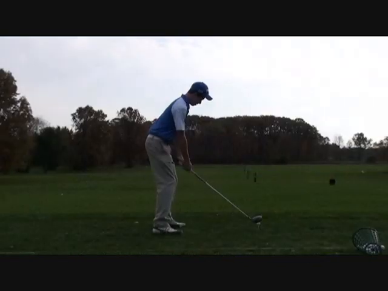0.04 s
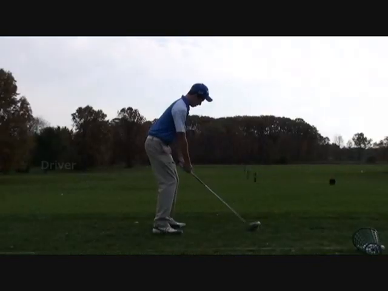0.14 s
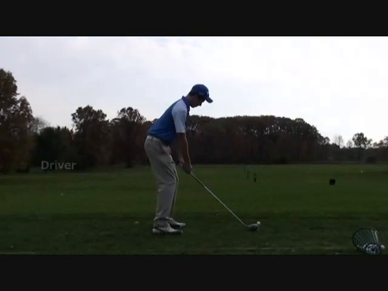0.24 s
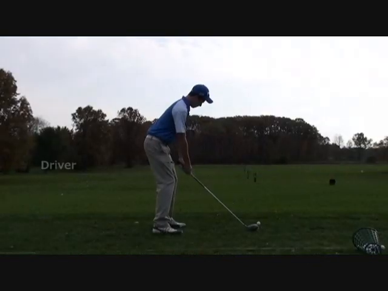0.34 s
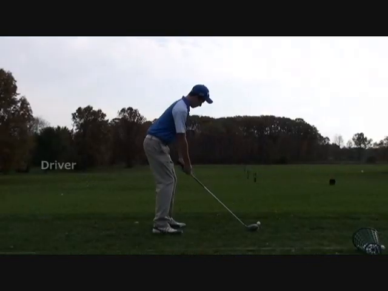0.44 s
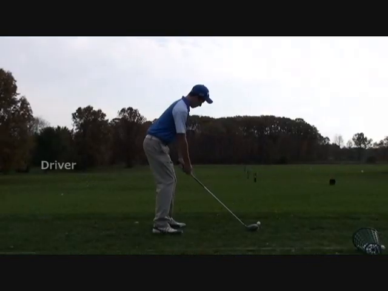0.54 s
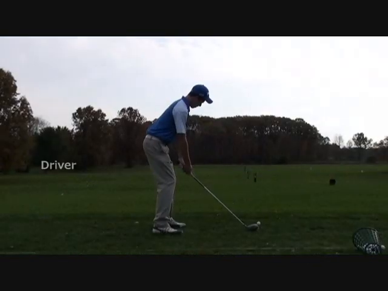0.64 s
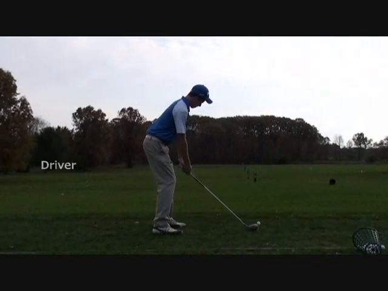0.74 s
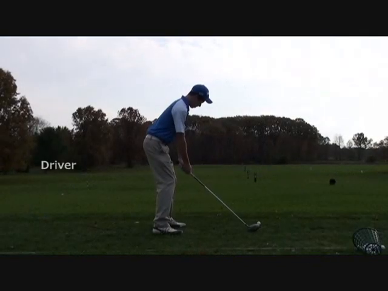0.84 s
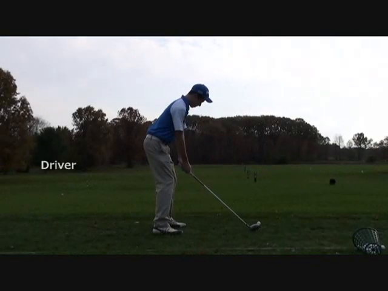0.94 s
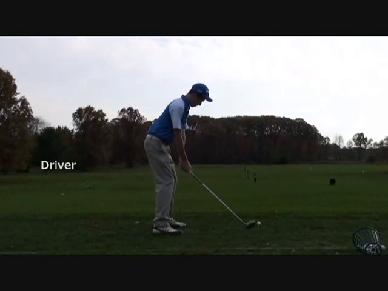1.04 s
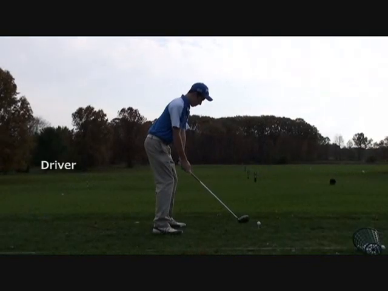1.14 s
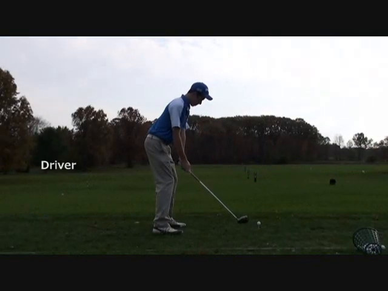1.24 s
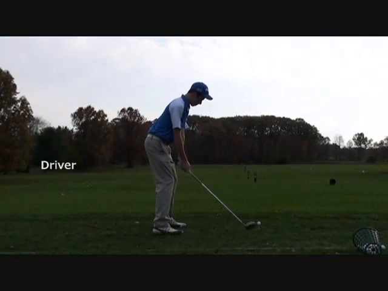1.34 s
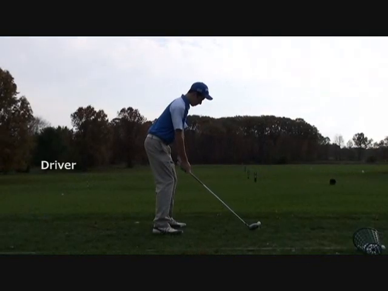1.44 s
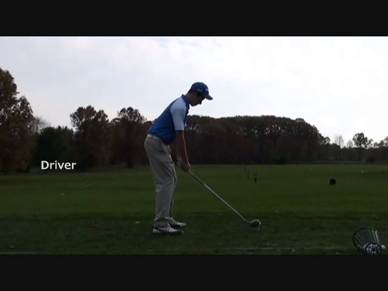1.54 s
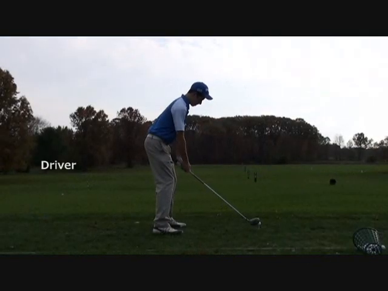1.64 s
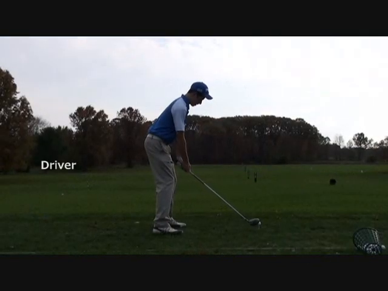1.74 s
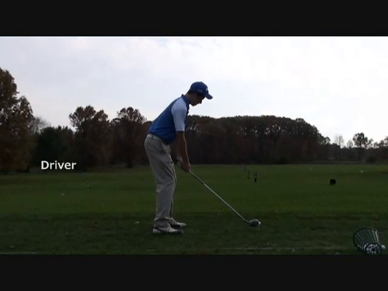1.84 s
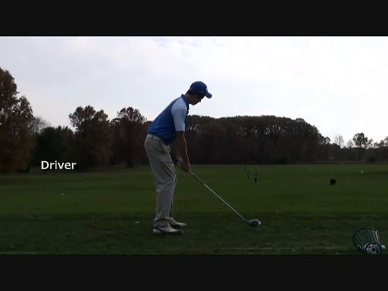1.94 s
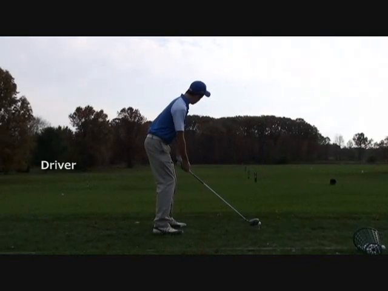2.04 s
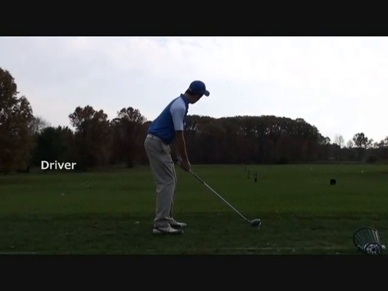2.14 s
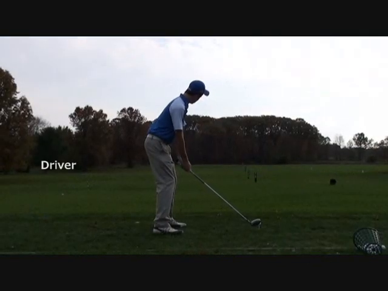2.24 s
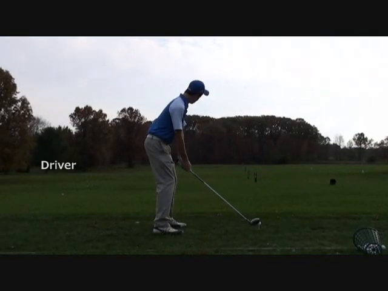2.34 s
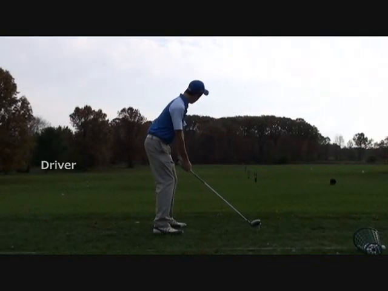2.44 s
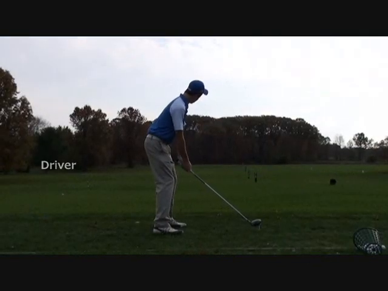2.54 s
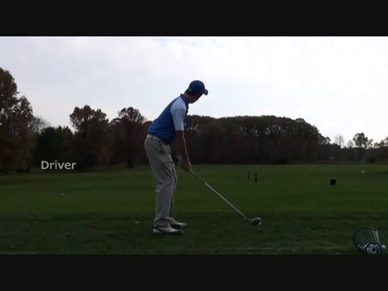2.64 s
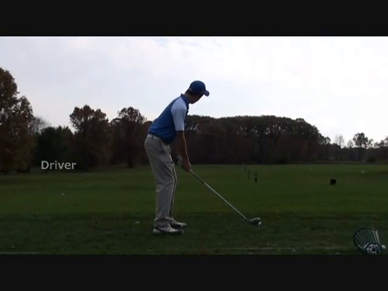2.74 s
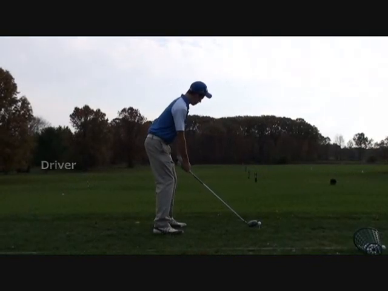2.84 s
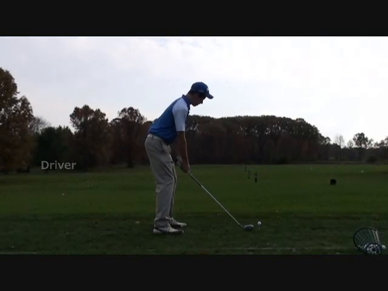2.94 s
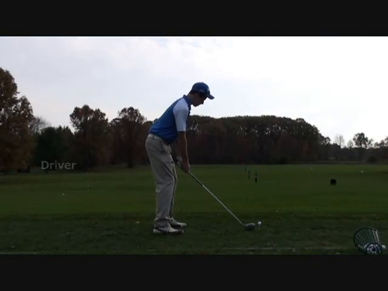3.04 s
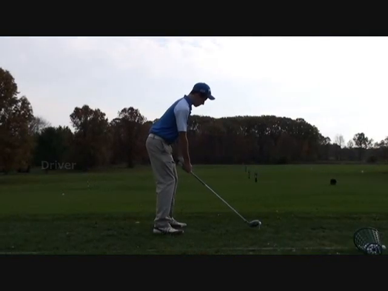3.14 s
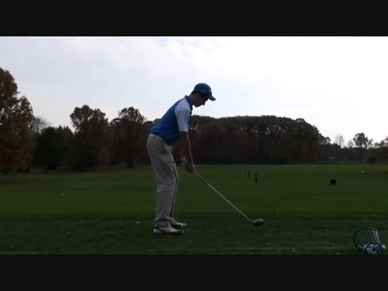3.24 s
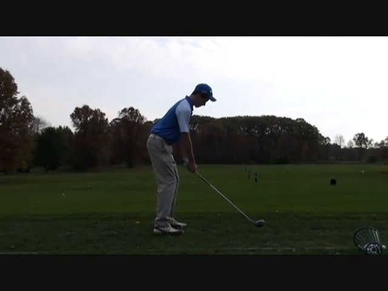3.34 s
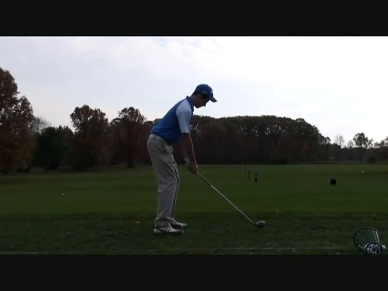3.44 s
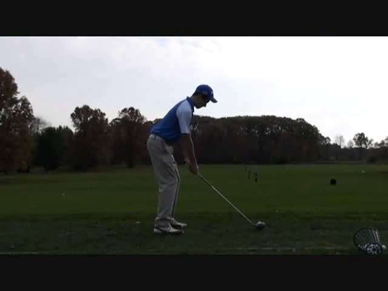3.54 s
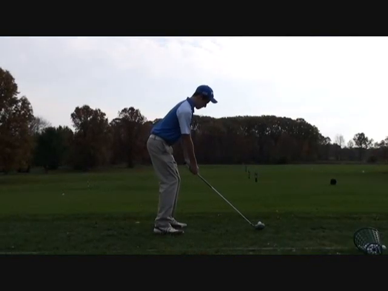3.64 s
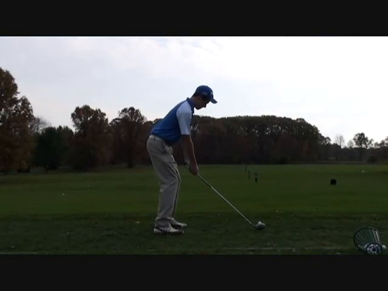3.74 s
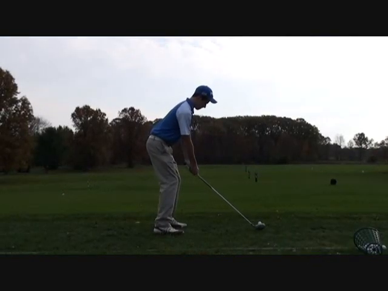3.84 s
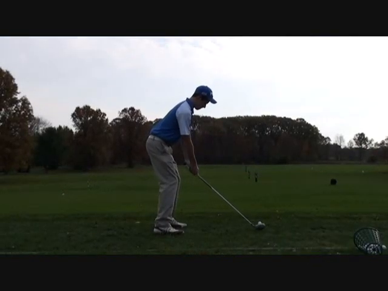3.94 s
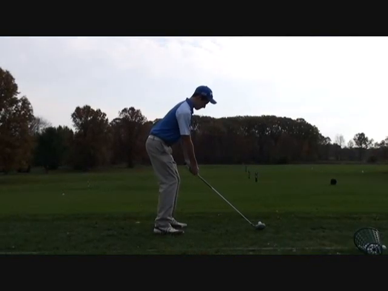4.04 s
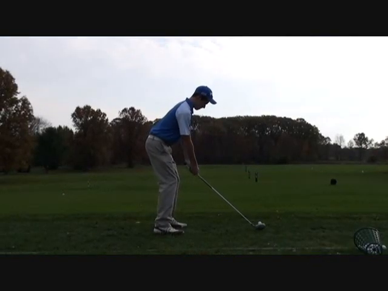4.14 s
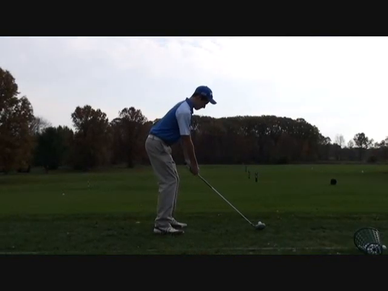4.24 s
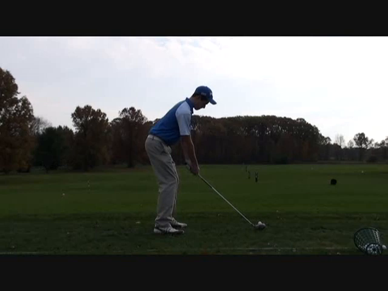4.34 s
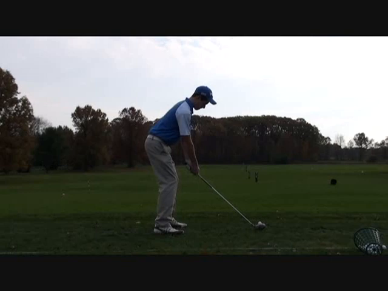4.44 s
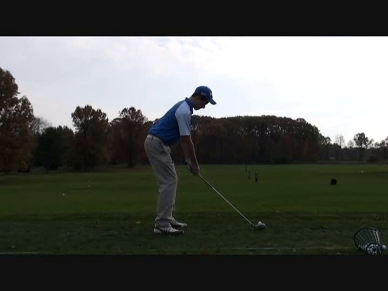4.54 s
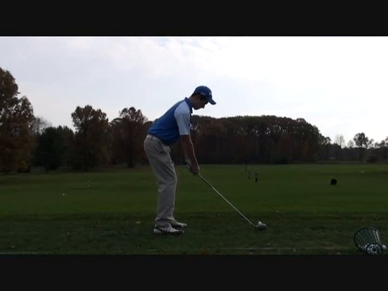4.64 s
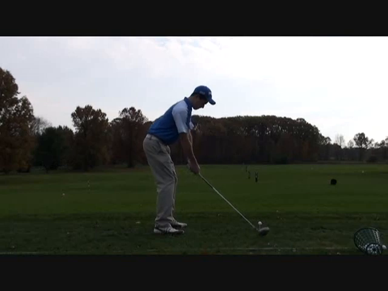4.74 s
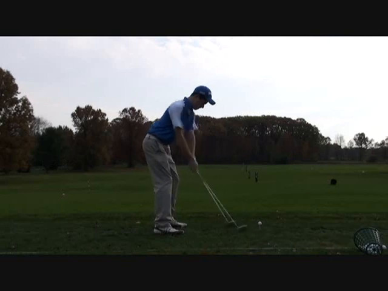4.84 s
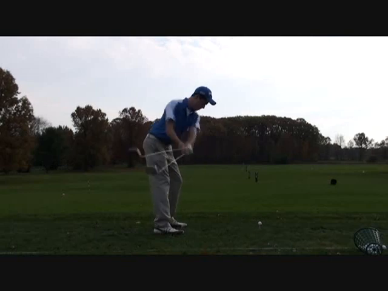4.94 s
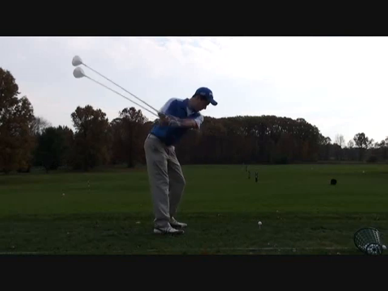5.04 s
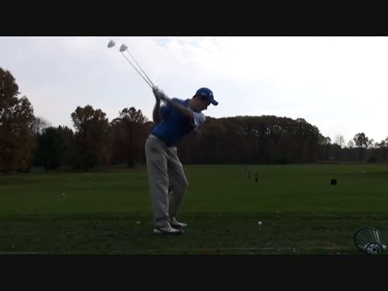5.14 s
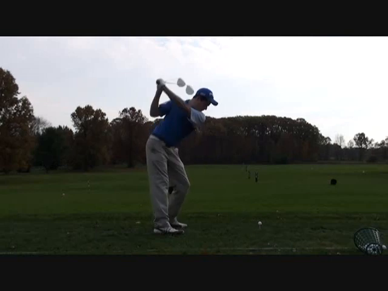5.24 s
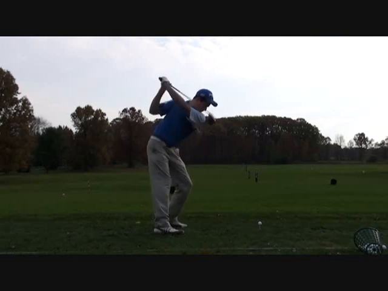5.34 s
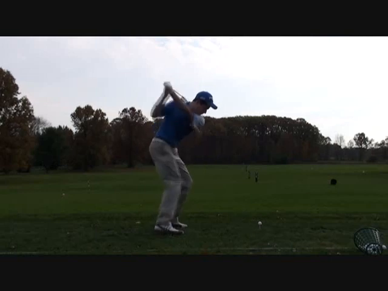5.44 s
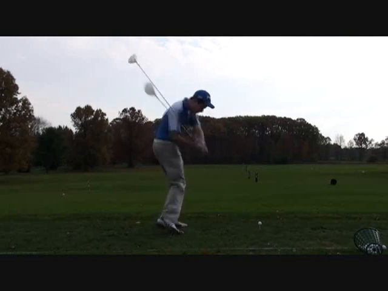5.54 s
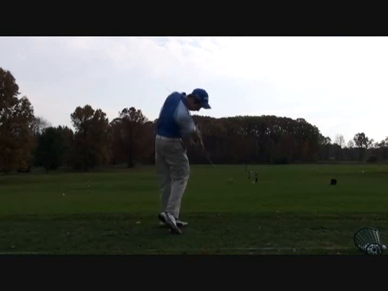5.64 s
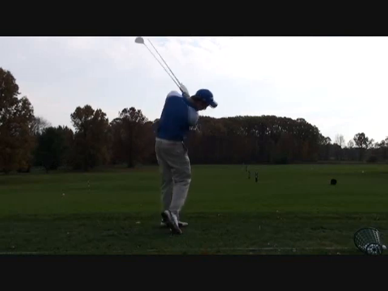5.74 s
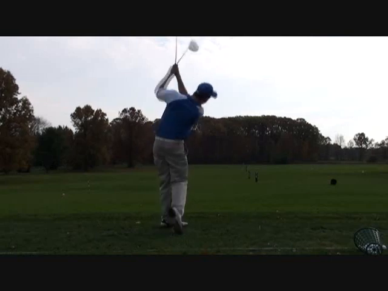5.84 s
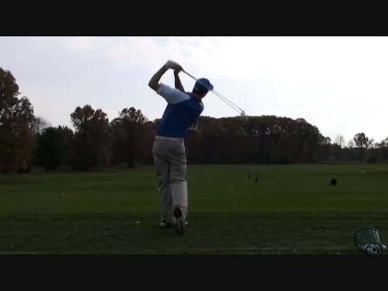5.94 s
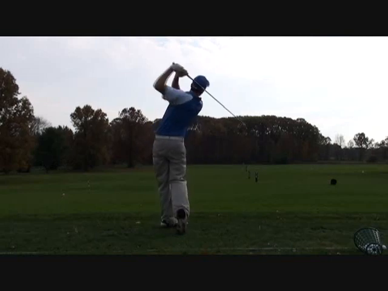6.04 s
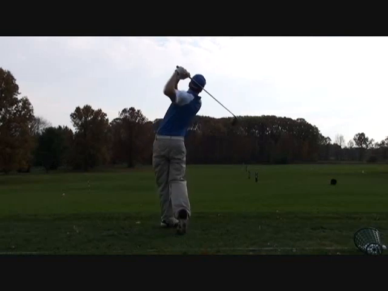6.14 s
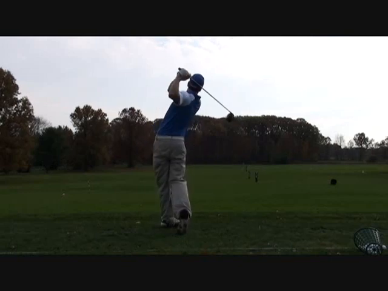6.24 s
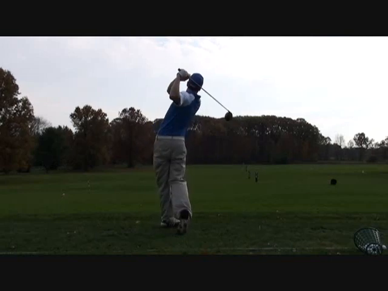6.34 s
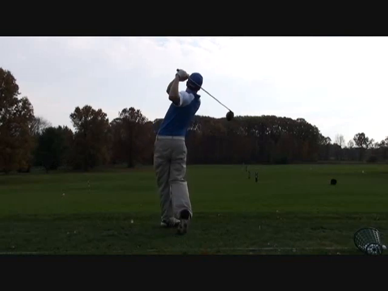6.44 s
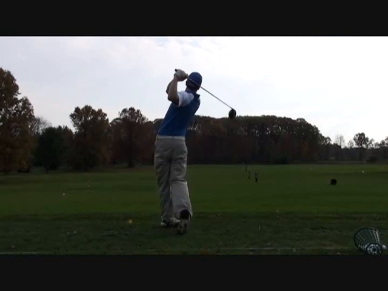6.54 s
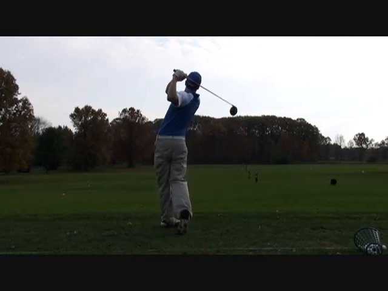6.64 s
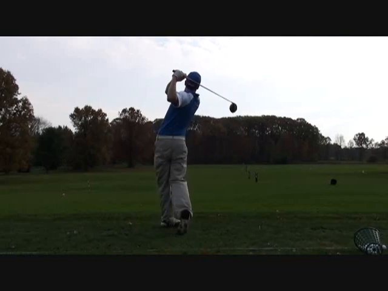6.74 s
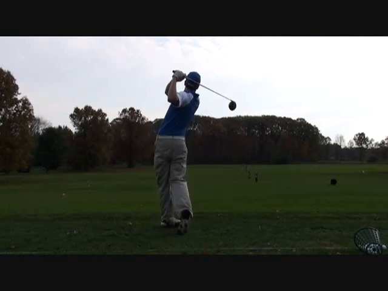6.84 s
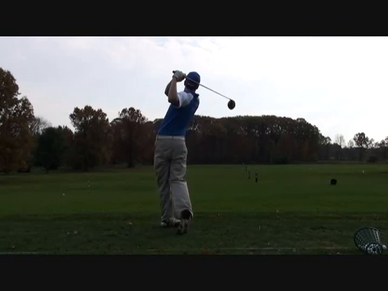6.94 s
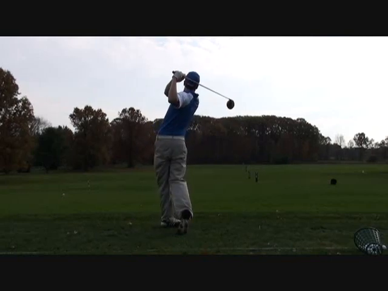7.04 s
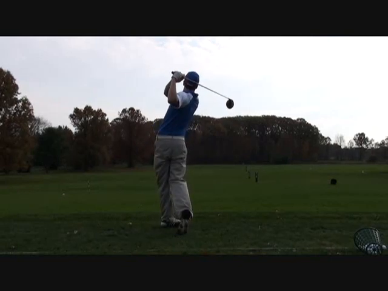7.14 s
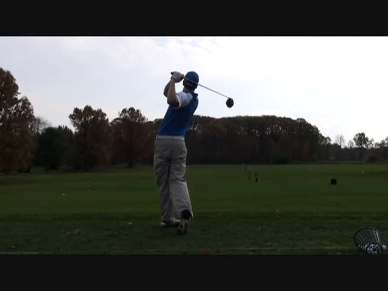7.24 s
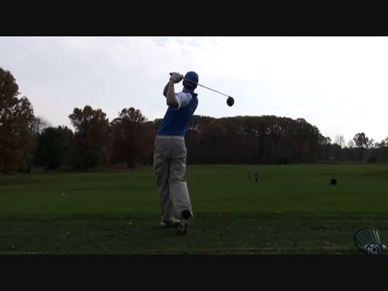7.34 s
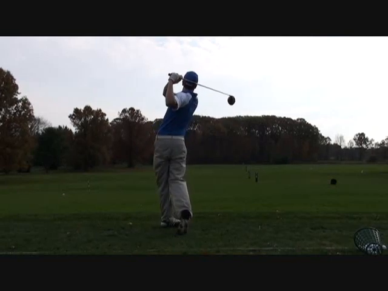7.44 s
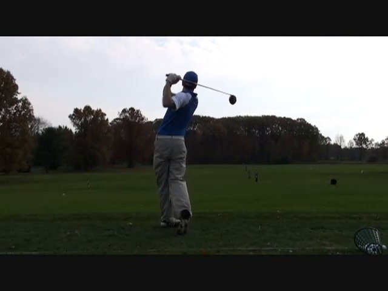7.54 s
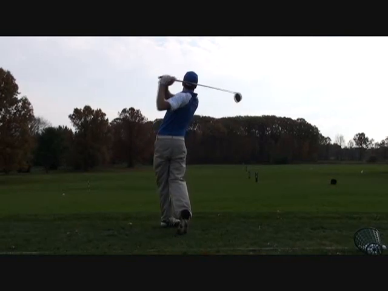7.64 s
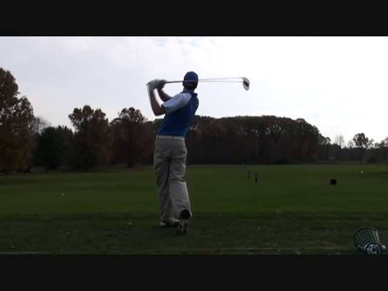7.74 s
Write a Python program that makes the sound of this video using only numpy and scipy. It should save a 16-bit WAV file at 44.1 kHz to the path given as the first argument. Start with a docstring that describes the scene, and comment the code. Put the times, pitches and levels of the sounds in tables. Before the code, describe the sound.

Outdoor stereo microphone near a golfer. Faint geese-like calls come from the left over steady hiss, rustling leaves and a far drone, becoming frequent before the swing. Low gusts flutter against the microphone. A driver rushes down and strikes the ball with a dry, piercing metallic snap; a diffuse echo fades quickly, leaving air, tiny ticks and stronger wind thumps.

```python
"""An open golf range: a driver swishes down and cracks a teed ball, heard close and nearly central.
The hollow metal head rings as decaying sine modes; ground, player and trees scatter the blow back as a noise cloud.
Geese-like harmonic calls sound on the left, filtered noise makes the leaves on the right and bright rustles,
and low noise in gusts and eddies buffets the two microphone ports over steady hiss, a far drone and a thin whine."""
import sys
import numpy as np
from scipy import signal
from scipy.fft import rfft, irfft
from scipy.io import wavfile
from scipy.ndimage import uniform_filter1d

SR = 44100
rng = np.random.default_rng(int(sys.argv[2]) if len(sys.argv) > 2 else 0)


def output_pcm(signal):
    """Save a mono or channel-first signal as 16-bit PCM at the path in sys.argv[1].

    Samples are clipped to [-1, 1] before scaling.
    """
    pcm = np.clip(np.atleast_2d(signal).T, -1, 1) * 32767
    wavfile.write(sys.argv[1], SR, np.round(pcm).astype(np.int16))


N = 343695
T = np.arange(N) / SR
STRIKE_S = 5.7665  # the moment of the blow


def undb(db):
    """Turn dB into an amplitude factor."""
    return 10 ** (np.asarray(db) / 20)


def unit(x):
    """Scale to rms 1."""
    return x / np.sqrt(np.mean(x ** 2))


def shape(points, hz):
    """Read a spectrum in dB at the given frequencies, interpolated over log frequency."""
    f, db = np.transpose(points)
    return np.interp(np.log(hz + 1), np.log(f), db)


def noise(points, alike):
    """Make two-channel noise of a given spectrum, rms 1; alike is the left-right correlation."""
    c = np.clip(alike, -1, 1)
    mid, side = rng.standard_normal((2, N))
    pair = np.sqrt(1 + c) * mid + np.sqrt(1 - c) * side * np.array([[1], [-1]])
    gain = undb(shape(points, np.fft.rfftfreq(N, 1 / SR)))
    return unit(irfft(rfft(pair) * gain, N))


def walk(rate):
    """Draw random levels, each held 1 / rate s, and slew them twice."""
    k = int(SR / rate)
    steps = np.repeat(rng.standard_normal(N // k + 1), k)
    return uniform_filter1d(uniform_filter1d(steps, k), k)[:N]


def hump(start, length):
    """A smooth swell, 0 to 1 and back, both arguments in s."""
    return np.sin(np.pi * np.clip((T - start) / length, 0, 1)) ** 2


def pan(db):
    """Left and right gains that differ by db; positive leans left."""
    return undb(np.array([db, -db]) / 2).reshape(2, -1)


def curve(points):
    """Gain over the scene from level points (t/s, level/dB)."""
    return undb(np.interp(T, *np.transpose(points)))


def club_head(t):
    """The hollow head rings in decaying modes, Doppler-shifted and unevenly exposed along its arc."""
    # modes of the metal head: f/Hz, level/dB, t60/s
    modes = [(2180, -41.5, 0.89), (3620, -26, 0.091), (4250, -18.5, 0.17), (4420, -28, 0.37),
             (5400, -12, .08), (5800, -8.5, 0.15), (5840, -11.5, .07), (6120, -2, 0.06), (6400, 1, 0.15),
             (6420, -11, 0.064), (6620, -11, .15), (6930, -23, 0.18), (7100, -15, 0.099), (7300, -18, 0.19),
             (8100, -10.5, 0.16), (8660, -19, 0.24), (8800, -4.5, .04), (9160, -9.5, .1),
             (9460, -11, 0.073), (9940, -10.5, 0.082), (11600, -15, 0.051)]
    # the ringing head on its arc: t after the blow/s, pitch shift/%, exposure/dB
    arc = [(0, -0.5, -1), (0.034, 0.5, -5), (0.065, 5.5, -2), (.08, 0.5, 6), (.5, 8.5, -16)]
    s, shift, exposure_db = np.transpose(arc)
    clock = np.cumsum(1 + np.interp(t, s, shift) / 100) / SR  # time warped by Doppler
    ring = 0
    for hz, db, t60 in modes:
        # each mode beams its own way, so it flickers as the head turns
        beam = undb(np.minimum(t / .005, 1) * 5 * walk(250)[:len(t)])
        decay = np.exp(-np.log(1000) * t / t60)
        ring = ring + undb(db) * beam * decay * np.sin(2 * np.pi * hz * clock)
    return ring * undb(np.interp(t, s, exposure_db))


def scattered_paths():
    """Noise echo response: near returns from ground and player, then the tree line fading slowly and dying."""
    near_db, near_hold_s = -33.5, 0.061
    trees_db, trees_hold_s = -46.5, .28
    late = T - STRIKE_S
    near = undb(near_db - 60 * np.maximum(late - near_hold_s, 0) / 0.076)
    trees = undb(trees_db - 60 * np.maximum(late - trees_hold_s, 0) / .6 - 24 * late)
    strength = np.clip(late / 0.021, 0, 1) * (near + trees)
    # scatterers favour the upper treble: f/Hz, level/dB
    paths = strength * noise(
        [(1500, -13.5), (4800, -13), (6400, -3.0), (7600, 7), (10500, -3.5), (16000, -13)], 0.34)
    # air swallows the top on the long way back
    far = np.clip(late / 0.2, 0, 1)
    dull = signal.sosfilt(signal.butter(2, 8500, fs=SR, output="sos"), paths)
    return (1 - far) * paths + far * dull


def strike():
    """A sub-millisecond blow rings the head; grass, player and tree line return it as a diffuse cloud."""
    strike_db = -6.5
    t = np.arange(SR // 2) / SR
    # the ball squashes and rebounds: one pressure swing
    blow = undb(-1) * np.exp(-t / 0.00048) * np.sin(2 * np.pi * 2000 * t)
    crack = undb(-5.0) * np.exp(-t / .002) * np.diff(rng.standard_normal(len(t) + 1))
    sound = undb(strike_db) * (club_head(t) + blow + crack)
    direct = np.zeros(N)
    direct[int(STRIKE_S * SR):][:len(t)] = sound
    # only the loud first instants come back audibly
    burst = sound * np.exp(-t / .0007)
    echoes = signal.fftconvolve(scattered_paths(), burst[None])[:, :N]
    return direct * pan(-1.5) + echoes


def swing():
    """Head and shaft stir broad noise that swells up to the blow and stops; a soft follow-through remains."""
    # swish spectrum: f/Hz, level per Hz/dB
    swish = [(150, -1.5), (400, -2.5), (850, 0), (1300, -8.5), (2000, -5), (3500, -10.5), (7000, -6),
             (10000, -9), (15500, -29)]
    downswing_s, swish_db, stop_s = 0.1, -24, 0.003
    follow_db, follow_s = -44, 0.22
    after = np.maximum(T - STRIKE_S, 0)
    down = hump(STRIKE_S - downswing_s, 2 * downswing_s) * np.exp(-after / stop_s)
    follow = hump(STRIKE_S, follow_s)
    return (undb(swish_db) * down + undb(follow_db) * follow) * noise(swish, 0.97)


def birds():
    """Harmonic calls whose pitch scoops up, arches and sags under throat and beak resonances."""
    # throat response: f/Hz, level/dB
    throat = [(1020, -30), (1270, -3), (1650, 0), (1950, -4), (2150, -20), (2450, -13), (3000, -45)]
    # arched calls: crest t/s, fall/s, crest f/Hz, level/dB, overtone level/dB, beak resonance f/Hz
    calls = [(.99, 0.046, 854, -49, -69, 3400), (1.78, 0.048, 848, -47, -69, 3400),
             (2.27, .05, 814, -48, -69, 3200), (2.912, 0.065, 792, -41, -51, 4000),
             (3.36, 0.054, 805, -40, -59, 3300), (3.61, 0.07, 782, -35, -47, 3800),
             (3.769, 0.075, 838, -30.5, -47, 4200), (3.886, 0.05, 815, -33, -41.5, 4100),
             (3.952, 0.072, 797, -34.5, -47, 3980), (4.065, 0.071, 854, -35.5, -52, 4200),
             (4.158, 0.041, 802, -39, -49, 3200), (4.275, 0.059, 787.4, -33, -41, 3900),
             (4.428, 0.064, 844, -35.5, -43, 3500), (4.475, 0.051, 774, -40.5, -51, 3900),
             (4.612, .068, 776.6, -35, -52, 3900), (4.709, 0.038, 780, -36.5, -53, 3900),
             (4.828, 0.078, 836, -40, -41.5, 3350), (4.977, 0.059, 788, -35, -42, 3970),
             (5.0, 0.046, 794, -40.5, -46, 4750), (5.11, .025, 697, -43, -56, 3500),
             (5.33, 0.087, 797, -45, -62, 3200), (5.47, .07, 768, -41.5, -61, 3100)]
    rise_s, scoop = .053, .35  # every call scoops up by a share of its crest pitch
    sag_hz_per_s = 2700  # longer falls sag further
    beak_width_hz = 630
    out = np.zeros(N)
    waver = 1 + .018 * walk(70)
    for crest, fall, crest_hz, db, bright_db, beak_hz in calls:
        i = slice(int((crest - rise_s) * SR), int((crest + fall) * SR))
        t = T[i] - crest
        below = np.where(t < 0, scoop * crest_hz * (t / rise_s) ** 2, sag_hz_per_s * t ** 2 / fall)
        hz = (crest_hz - below) * waver[i]
        phase = 2 * np.pi * np.cumsum(hz) / SR
        swell = hump(crest - rise_s, rise_s + fall)[i]
        for k in range(1, 9):
            # the beak opens only at full effort; its second resonance lies higher and weaker
            beak = np.exp(-((k * hz - beak_hz) / beak_width_hz) ** 2)
            beak = beak + 0.53 * np.exp(-((k * hz - 1.42 * beak_hz) / 700) ** 2)
            voice = undb(db + shape(throat, k * hz)) * swell ** 0.13
            out[i] += (voice + undb(bright_db) * beak * swell) * np.sin(k * phase)
    out *= undb(1.95 * walk(70))
    # a diffuse noise tail follows each call
    tail = rng.standard_normal((2, SR // 3)) * np.exp(-np.arange(SR // 3) / SR / 0.096) * undb(-38)
    return pan(6.) * (out + signal.fftconvolve(out[None], tail)[:, :N])


def wind():
    """Turbulence on the ports: large eddies rumble in both alike, small ones flutter on one port at a time."""
    # gust strength: t/s, level/dB
    gusts = [(0, -40), (.2, -49), (1.1, -46.5), (1.4, -40), (1.7, -42.5), (2.5, -41.5), (3.0, -45),
             (3.42, -42.5), (3.55, -33.5), (4.15, -33), (4.7, -40), (5.55, -45.5), (6.0, -37.5),
             (6.55, -40.5), (7.1, -32.5), (7.79, -35)]
    # eddies that thump the ports: centre t/s, rumble level/dB, length/s
    eddies = [(0.037, -31.5, 0.13), (2.55, -34.5, 0.18), (3.521, -31.5, .03), (3.602, -27, 0.09),
              (3.647, -27.5, .048), (3.97, -35.5, .14), (4.341, -27, 0.094), (4.584, -35, 0.14),
              (4.961, -24.5, .089), (5.658, -25.5, 0.052), (5.963, -33.5, 0.031), (6.081, -29, .17),
              (6.249, -33, 0.063), (6.457, -30, 0.054), (6.658, -20.5, .11), (6.846, -35.5, .063),
              (7.013, -24, 0.094), (7.087, -31, 0.06), (7.15, -27.5, .062), (7.281, -34, 0.14),
              (7.412, -29, 0.083), (7.579, -25.5, 0.12)]
    # flutter equals rumble at even_db and grows faster
    even_db, flutter_growth = -25.5, 1.57
    one_sided_db = 9.5  # depth of the random lean between ports
    rumble = noise([(22, -8), (50, 1), (110, -2), (200, -13.5), (400, -35.5), (900, -88)], 0.9)
    flutter = noise([(70, -8.5), (170, 7), (450, -5), (900, -25), (2500, -88)], -0.25)
    flutter = flutter * pan(one_sided_db * walk(12))
    out = curve(gusts) * undb(4.84 * walk(16)) * (rumble + undb(-11.5) * flutter)
    for s, db, length in eddies:
        swell = hump(s - length / 2, length)
        core = swell ** 5.0  # the fine flutter gathers in the middle of the eddy
        flutter_db = even_db + flutter_growth * (db - even_db)
        for air, gate, air_db in ((rumble, swell, db), (flutter, core, flutter_db)):
            # hold each eddy to its level whatever the noise does inside the gate
            level = np.sqrt(np.mean(gate ** 2) / np.mean((air * gate) ** 2))
            out += undb(air_db) * air * gate * level
    return out


def rustles():
    """Short bright swishes and ticks close by, all gated from one treble hiss."""
    # brief bright rustles: start t/s, level/dB, length/s
    swishes = [(4.337, -55, 0.093), (4.43, -60, .12), (4.774, -47, 0.19)]
    # small ticks: t/s, level/dB
    ticks = [(2.039, -46), (4.126, -44), (4.379, -45), (4.45, -45), (5.808, -22), (7.17, -49), (7.319, -37)]
    hiss = noise([(3500, -40), (8000, 0), (11500, -4), (16000, -24)], .8)
    gate = sum(undb(db) * hump(s, length) for s, db, length in swishes)
    gate = gate * undb(4.8 * walk(150) + 4 * walk(40))
    for s, db in ticks:
        gate = gate + undb(db) * (T > s) * np.exp(-np.abs(T - s) / .0015)
    return gate * hiss


def field():
    """Steady outdoor hiss, leaves to the right, a far traffic-like drone and a thin high whine, all noise."""
    # leaf strength: t/s, level/dB
    leaf_levels = [(0.0, -45), (0.43, -42), (2.26, -47), (7.79, -47)]
    # leaf spectrum: f/Hz, level per Hz/dB
    leaf_spectrum = [(880, -9.5), (1500, -1), (2110, -3), (2320, -3.5), (3870, -1), (6820, -2),
                     (12000, -21), (15600, -74), (22000, -120)]
    # open-air hiss spectrum: f/Hz, level per Hz/dB
    hiss_spectrum = [(150, -5), (300, -9), (500, -12), (1100, -13), (1600, -16), (5250, -23), (8000, -29),
                     (10700, -38), (15700, -37.5)]
    # drone strength: t/s, level/dB
    drone_levels = [(0, -56.5), (1.4, -48.5), (2.2, -54.5), (4, -54), (7.79, -58)]
    hiss_db = -43
    leaves = curve(leaf_levels) * undb(.5 * walk(14.0)) * noise(leaf_spectrum, 0.37) * pan(-6.5)
    drone = curve(drone_levels) * noise([(400, -36), (800, -1.0), (950, -1.0), (1600, -37)], 0.64)
    whine = undb(-72.0) * noise([(14500, -40), (15400, -2), (16000, -30)], 1.0)
    hiss = undb(hiss_db + .5 * walk(2.28)) * noise(hiss_spectrum, 0.81)
    return hiss + leaves + drone + whine


def scene():
    """Mix the strike, its swish and everything around it."""
    return strike() + swing() + birds() + wind() + rustles() + field()


def record(dry):
    """The recorder rounds the peak and cuts the top."""
    top_hz = 15700
    rounded = np.tanh(0.76 * dry) / 0.8
    return signal.sosfilt(signal.ellip(12, .3, 80, top_hz, fs=SR, output="sos"), rounded)


dry = scene()
out = record(dry)
output_pcm(out)
```